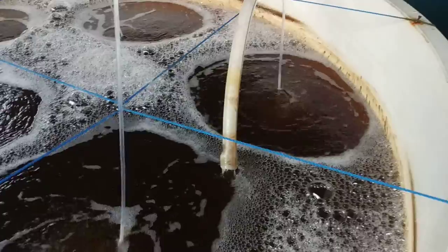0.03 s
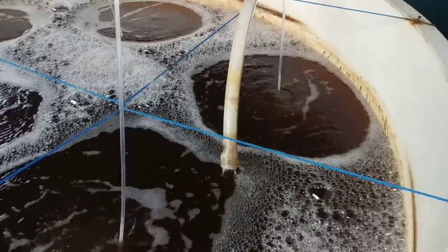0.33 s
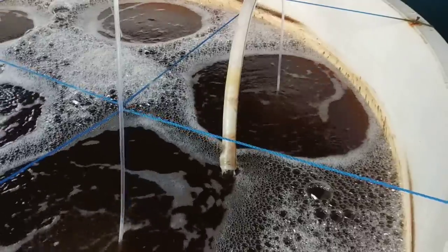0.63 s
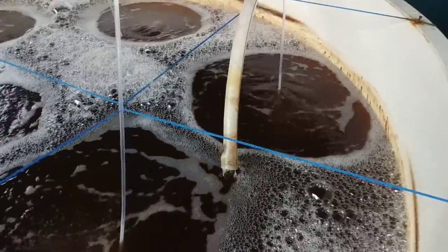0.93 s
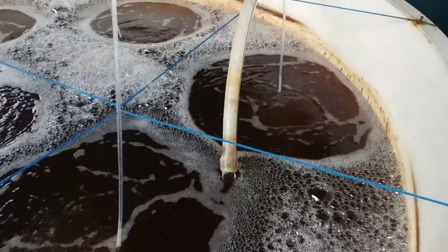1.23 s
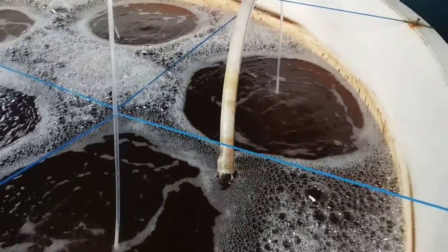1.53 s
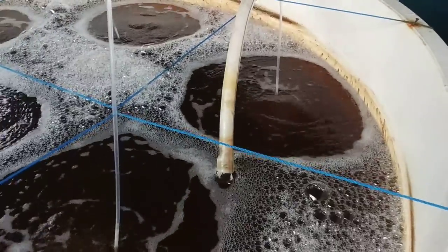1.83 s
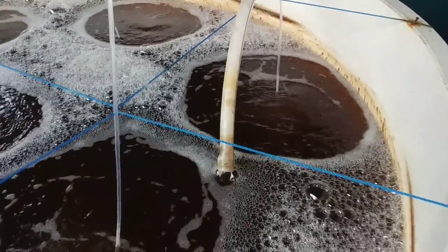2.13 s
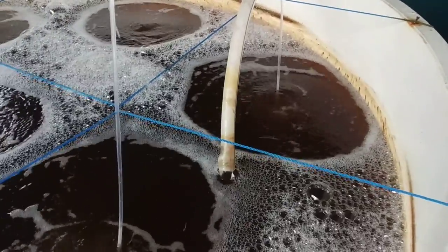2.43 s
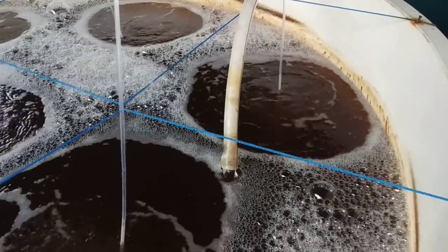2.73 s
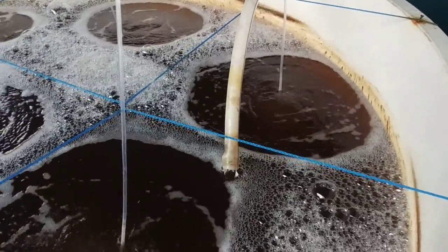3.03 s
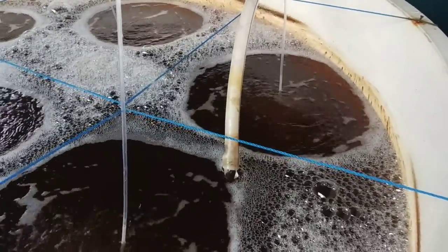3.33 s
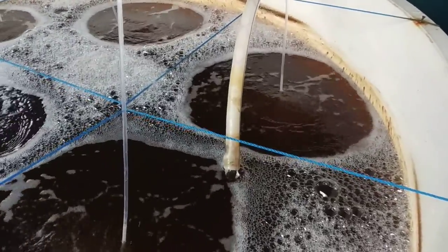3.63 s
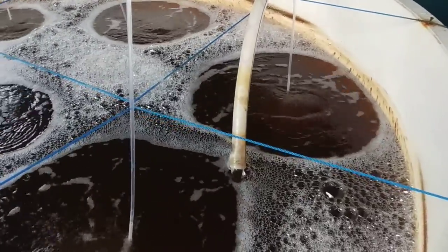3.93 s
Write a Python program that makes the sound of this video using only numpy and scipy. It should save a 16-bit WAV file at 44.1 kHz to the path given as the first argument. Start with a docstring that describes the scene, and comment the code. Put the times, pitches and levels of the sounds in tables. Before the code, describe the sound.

Steady splashing, bubbling water in a foamy pond over the low hum of a pump.

```python
"""After 0.25 s of silence the recorder fades in on thin streams of water pouring into a foamy, aerated
pond: a dense splash, gurgling bubbles and the fizz of bursting foam, with an air pump humming beneath.
At 0.53 s the recorder's low cut lets go and the bass opens with a soft thump. Water and pump run on
to the end, full in the left microphone port, faint and muffled in the right."""
import sys
import numpy as np
from scipy import signal
from scipy.fft import rfft, irfft, next_fast_len
from scipy.io import wavfile
from scipy.ndimage import uniform_filter1d, map_coordinates

SR = 44100
rng = np.random.default_rng(int(sys.argv[2]) if len(sys.argv) > 2 else 0)


def pcm_store(signal):
    """Save signal as 16-bit PCM."""
    levels = np.round(np.clip(np.atleast_2d(signal), -1, 1) * 32767)
    wavfile.write(sys.argv[1], SR, levels.astype(np.int16).T)


N = 176400
TOP_HZ = 15800


def amp(db):
    """Decibels to gain."""
    return 10 ** (np.asarray(db) / 20)


def unit(x):
    """Scale to rms 1."""
    return x / np.sqrt(np.mean(x ** 2) + 1e-20)


def along(points, hz):
    """Interpolate (freq_hz, value) rows on a log axis."""
    freq_hz, value = np.transpose(points)
    return np.interp(np.log(hz + 1), np.log(freq_hz + 1), value)


def wobble(per_s):
    """Smooth random curve, per_s knots a second."""
    knots = rng.standard_normal(int(N * per_s / SR) + 4)
    return map_coordinates(knots, [np.arange(N) * per_s / SR])


def filtered(x, response):
    """Apply a complex frequency response."""
    size = next_fast_len(N + SR // 2)
    return irfft(rfft(x, size) * response(np.fft.rfftfreq(size, 1 / SR)), size)[..., :N]


def rush(spectrum, patchy_db):
    """Coloured noise with time-frequency patches of random gain; rms 1."""
    bins = signal.stft(rng.standard_normal(N), nperseg=512)[2]
    patches = uniform_filter1d(rng.standard_normal(bins.shape), size=6, axis=0)
    patches = uniform_filter1d(patches, size=12, axis=1)
    noise = signal.istft(bins * amp(patchy_db * unit(patches)), nperseg=512)[1][:N]
    return unit(filtered(noise, lambda hz: amp(along(spectrum, hz))))


def bubbles(count, samples, hz, log_spread, cycles, rise, scatter_db):
    """Random bubble rings: sines that rise in pitch and lose 30 dB per `cycles` periods; rms 1."""
    when, strength = rng.random((2, count, 1))
    pitch_hz = np.clip(hz * np.exp(log_spread * rng.standard_normal((count, 1))), 200, TOP_HZ)
    k = np.arange(samples)
    turns = pitch_hz * k / SR
    age = turns / cycles
    glide = 1 + rise * np.minimum(age, 2) / 2
    envelope = (1 - np.exp(-2 * turns)) * amp(scatter_db * strength - 30 * age)
    rings = envelope * np.sin(2 * np.pi * turns * glide)
    index = (when * N).astype(int) + k
    return unit(np.bincount(index.ravel(), rings.ravel(), N)[:N])


# Splash spectrum: freq_hz, relative_density_db
SPLASH_SPECTRUM = [(70, -24), (120, -14), (170, -6.5), (270, -3), (440, -4.5), (600, -2), (800, -4),
                   (1150, -3.7), (1500, -4.5), (2100, -3.5), (4200, -7), (6000, -4.5), (8000, -3.5),
                   (9900, -2), (11500, -5), (12600, -7.5), (13700, -11.5), (15500, -13.3)]


def splash():
    """Thin streams hit the pond: dense broadband noise."""
    return amp(-24.5) * rush(SPLASH_SPECTRUM, patchy_db=0.85)


def trapped_air():
    """Air trapped by the streams rings: large bubbles gurgle, small ones tinkle."""
    gurgle = bubbles(400, samples=4400, hz=276, log_spread=0.141, cycles=24, rise=0.066, scatter_db=24)
    tinkle = bubbles(3200, samples=1300, hz=1711, log_spread=0.454, cycles=16, rise=0.13, scatter_db=6)
    return amp(-46.5) * gurgle + amp(-40.5) * tinkle


def foam():
    """Foam bursts: a fizz of short ticks and longer-ringing pops."""
    fizz = bubbles(16000, samples=120, hz=9400, log_spread=0.2, cycles=3.3, rise=0.1, scatter_db=22)
    pops = bubbles(1100, samples=1300, hz=4307, log_spread=0.3, cycles=72, rise=0.024, scatter_db=21)
    return amp(-40) * fizz + amp(-44.5) * pops


# Tank resonances: centre_hz, width_hz, relative_db
TANK_MODES = [(292, 11, -3.5), (319, 15.4, 2), (360, 24, -7), (409, 26, -4.5), (496, 14, -3), (528, 25, -3),
              (564, 16, -4.5), (697, 46, -8.5), (1058, 11, -5), (1100, 12, -5), (1143, 12, -15.5)]


def tank():
    """Water noise rings the hollow tank; the modes add in power."""
    def response(hz):
        modes = (amp(db) * hz * width_hz / (centre_hz ** 2 - hz ** 2 + 1j * hz * width_hz)
                 for centre_hz, width_hz, db in TANK_MODES)
        return np.sqrt(sum(abs(mode) ** 2 for mode in modes))
    return amp(-39) * unit(filtered(rng.standard_normal(N), response))


# Churn spectrum: freq_hz, relative_density_db
CHURN_SPECTRUM = [(10, -4), (25, -1.5), (60, -5), (85, 4.5), (105, -1.5), (122, -4), (200, -40)]


def churn():
    """Churning water rumbles unevenly."""
    return amp(-44) * rush(CHURN_SPECTRUM, patchy_db=-3.5)


def water(flutter_db=0.46, surge_db=0.16):
    """Unsteady flow modulates every water layer but the churn."""
    flow = amp(flutter_db * wobble(per_s=45) + surge_db * wobble(per_s=4.81))
    return flow * (splash() + trapped_air() + foam() + tank()) + churn()


# Pump hum lines: harmonic, rms_db
PUMP_LINES = [(1, -34.5), (2, -44), (3, -54.5), (4, -54.5), (18, -48.5), (22, -58.5)]


def air_pump(stroke_hz=50, waver_db=0.5):
    """The pump hums on multiples of its stroke rate; each line wavers."""
    stroke_rad = 2 * np.pi * stroke_hz * np.arange(N) / SR
    hum = np.zeros(N)
    for harmonic, rms_db in PUMP_LINES:
        peak = np.sqrt(2) * amp(rms_db + waver_db * wobble(per_s=18))
        hum += peak * np.sin(harmonic * stroke_rad + 2 * np.pi * rng.random())
    return hum


# Right port response relative to left: freq_hz, gain_db
RIGHT_RESPONSE = [(25, 5), (50, -9), (100, -12), (200, -19), (500, -25.5), (1050, -25.5), (1800, -34.5),
                  (4000, -36), (7000, -41), (10000, -44), (15000, -31.5)]
# Likeness of the two ports: freq_hz, coherence
PORT_COHERENCE = [(50, 0.9), (140, 0.8), (300, 0.85), (550, 0.76), (1000, .6), (2000, .1)]


def right_port(left, lag_rad=1, delay_s=0.00055):
    """The right port shares the bass, slightly late, and gets almost no treble."""
    coherence = lambda hz: np.clip(along(PORT_COHERENCE, hz), 0, 1)
    shared = filtered(left, lambda hz: coherence(hz) * np.exp(-1j * (lag_rad + 2 * np.pi * hz * delay_s)))
    own = filtered(water(), lambda hz: np.sqrt(1 - coherence(hz) ** 2))
    return filtered(shared + own, lambda hz: amp(along(RIGHT_RESPONSE, hz)))


def scene():
    """Water and pump at the left and right ports."""
    left = water() + air_pump()
    return np.array([left, right_port(left)])


START_S, START_GAIN, FADE_GAIN_PER_S = 0.25, 0.12, 4
LOW_CUT_HZ, OPEN_S, OPEN_TAU_S = 123, 0.527, 0.0069
THUMP_DB, THUMP_CREST_S, THUMP_WIDTH_S = -19, 0.04, 0.11


def record(dry):
    """Recorder: fade-in, a low cut that lets go with a thump, band limit."""
    t = np.arange(N) / SR
    fade = (t > START_S) * np.clip(START_GAIN + FADE_GAIN_PER_S * (t - START_S), 0, 1)
    since_open_s = np.maximum(t - OPEN_S, 0)
    opened = 1 - np.exp(-since_open_s / OPEN_TAU_S)
    thin = filtered(dry, lambda hz: hz ** 2 / np.hypot(hz ** 2, LOW_CUT_HZ ** 2))
    thump = amp(THUMP_DB) * np.exp(-((since_open_s - THUMP_CREST_S) / THUMP_WIDTH_S) ** 2)
    mix = fade * ((1 - opened) * thin + opened * (dry + thump))
    return filtered(mix, lambda hz: np.clip((TOP_HZ - hz) / 300 + 0.5, 0, 1))


dry = scene()
out = record(dry)
pcm_store(out)
```